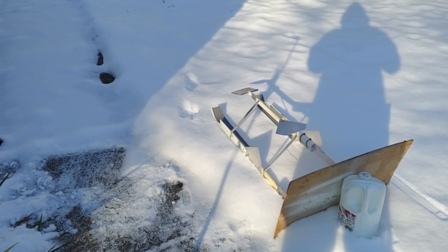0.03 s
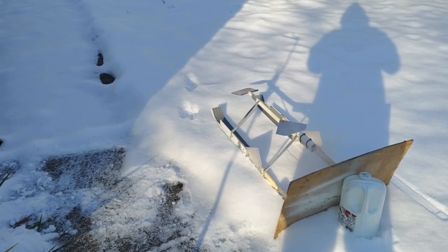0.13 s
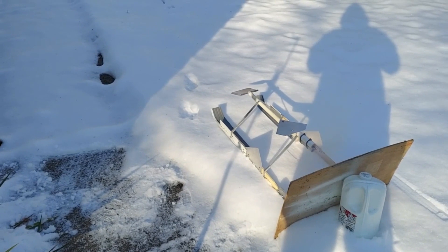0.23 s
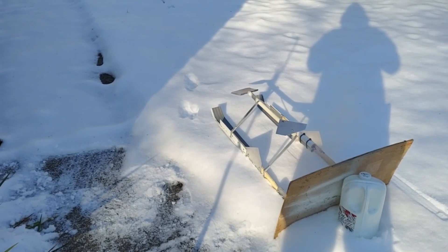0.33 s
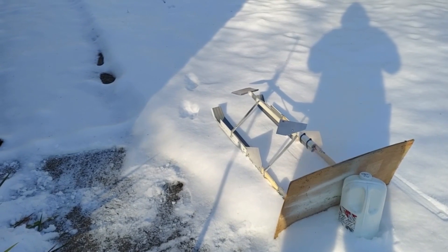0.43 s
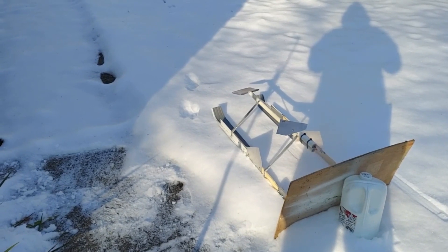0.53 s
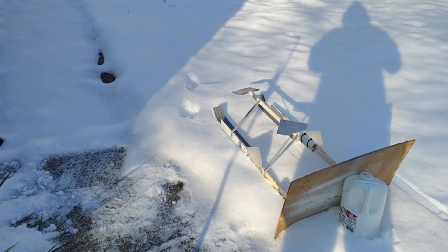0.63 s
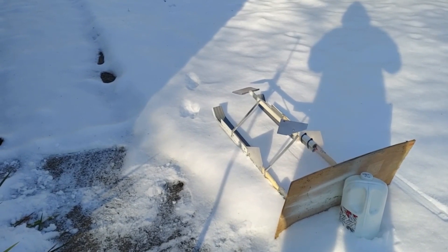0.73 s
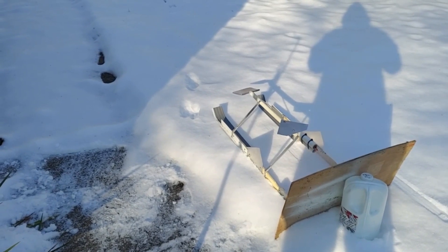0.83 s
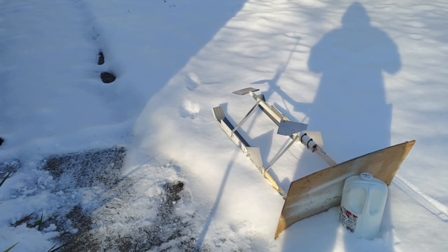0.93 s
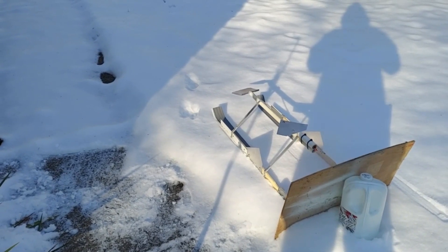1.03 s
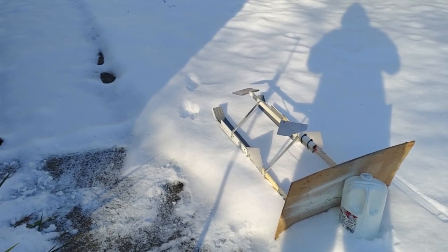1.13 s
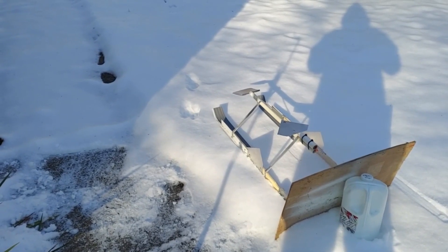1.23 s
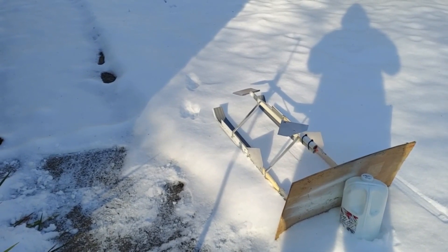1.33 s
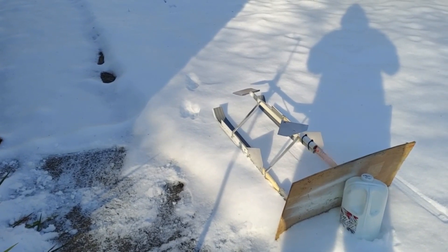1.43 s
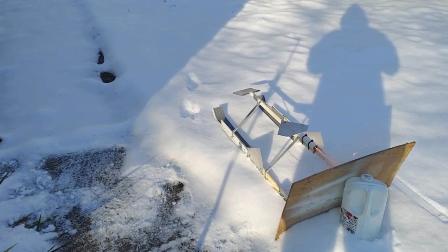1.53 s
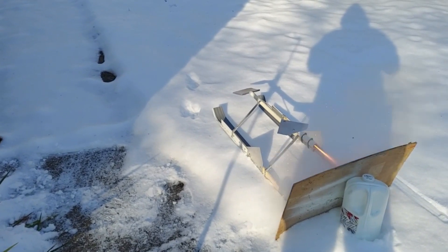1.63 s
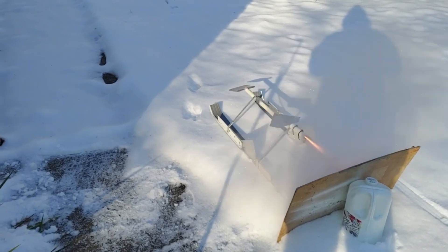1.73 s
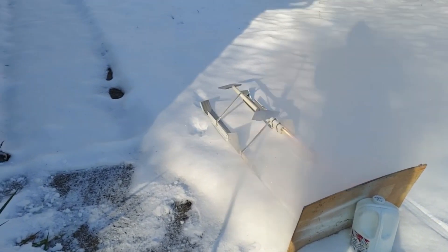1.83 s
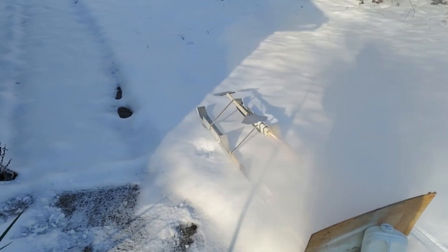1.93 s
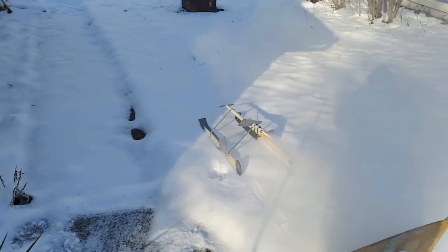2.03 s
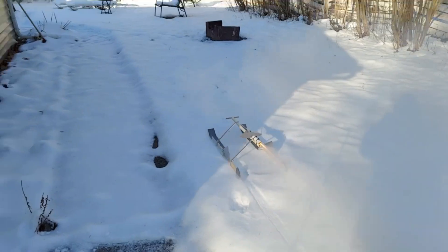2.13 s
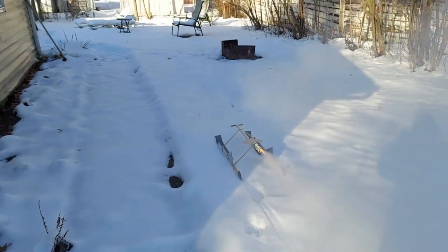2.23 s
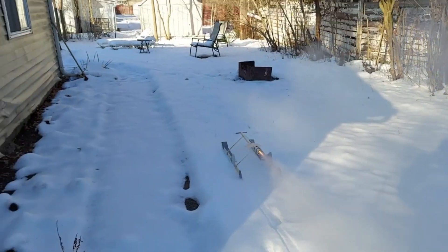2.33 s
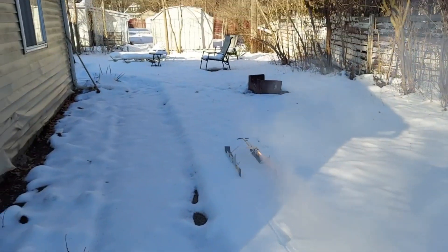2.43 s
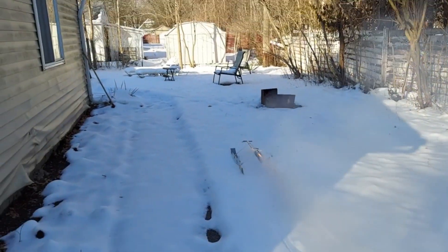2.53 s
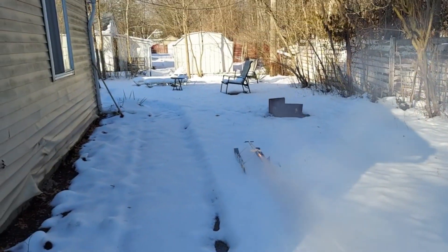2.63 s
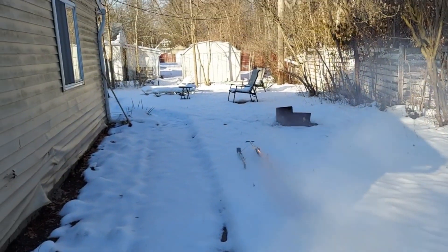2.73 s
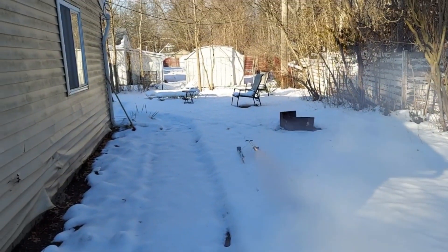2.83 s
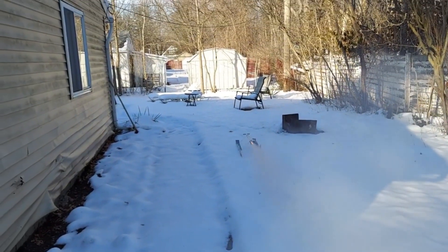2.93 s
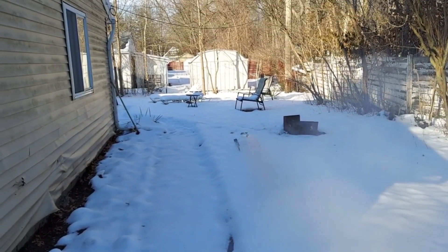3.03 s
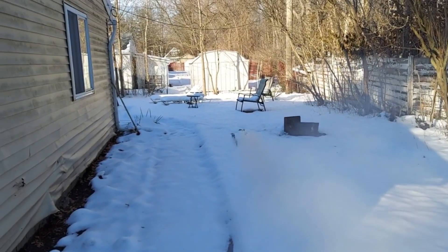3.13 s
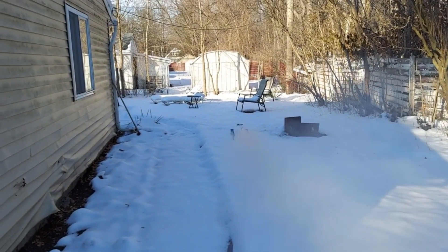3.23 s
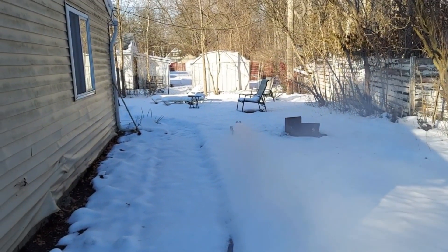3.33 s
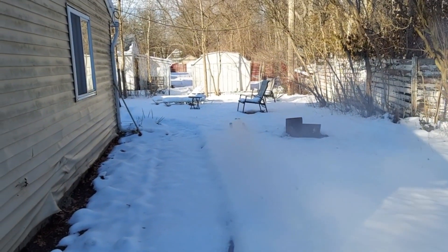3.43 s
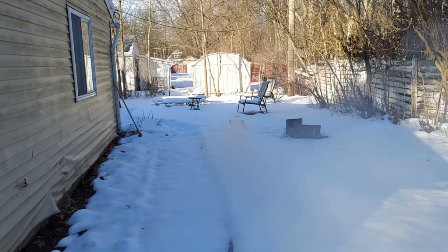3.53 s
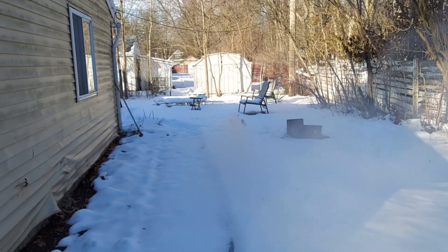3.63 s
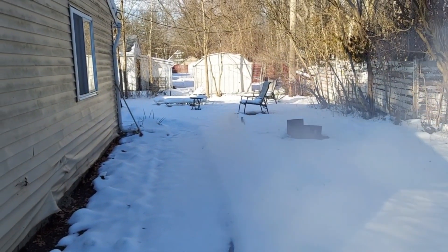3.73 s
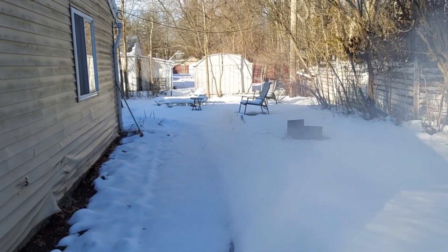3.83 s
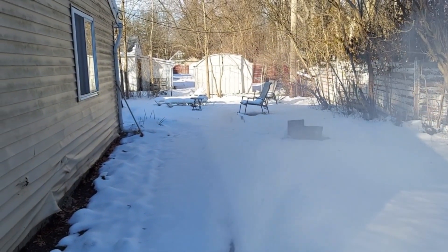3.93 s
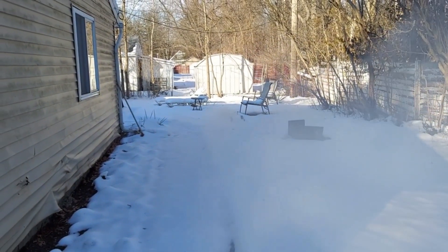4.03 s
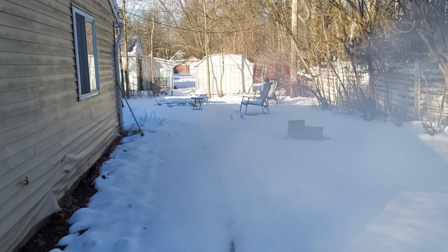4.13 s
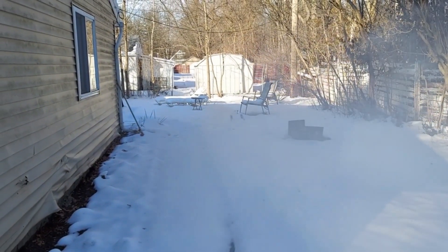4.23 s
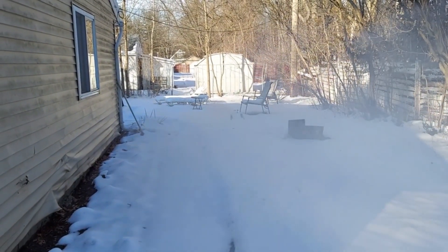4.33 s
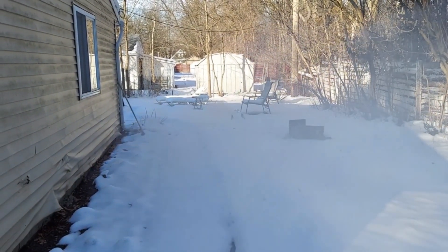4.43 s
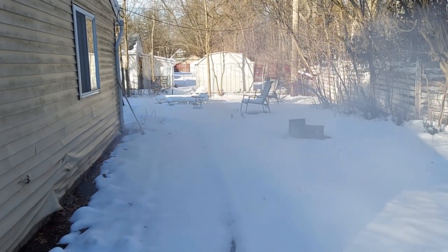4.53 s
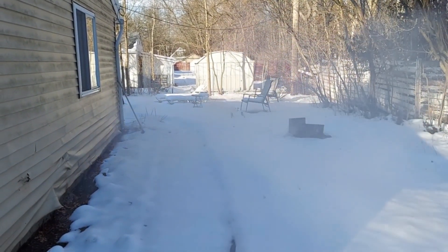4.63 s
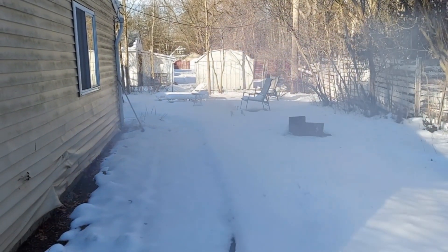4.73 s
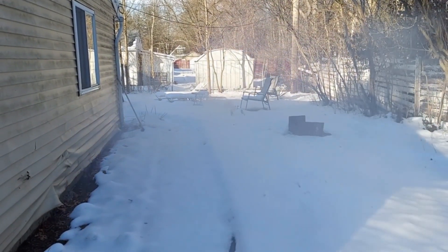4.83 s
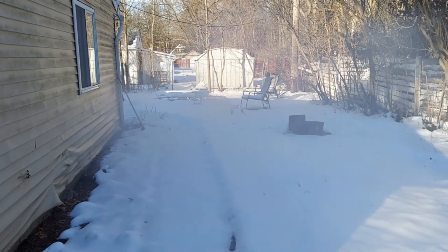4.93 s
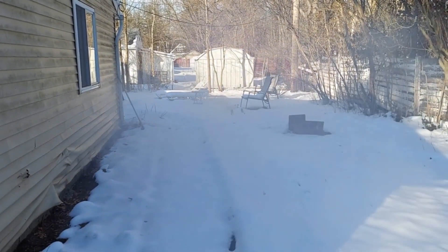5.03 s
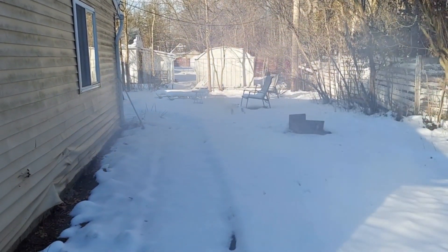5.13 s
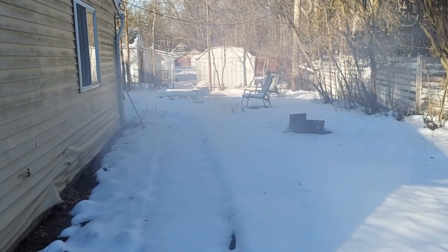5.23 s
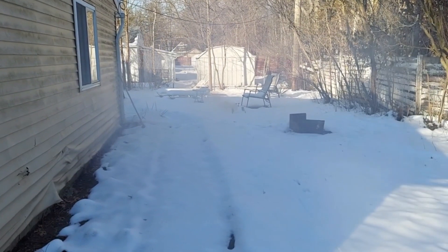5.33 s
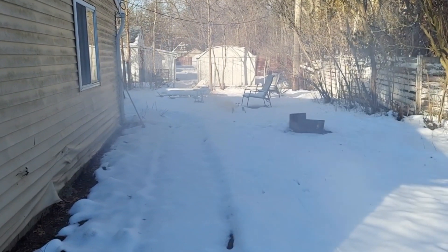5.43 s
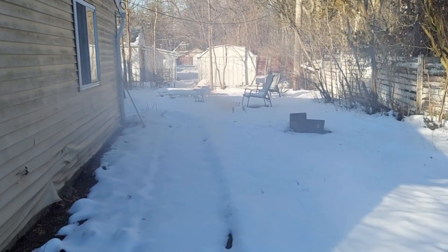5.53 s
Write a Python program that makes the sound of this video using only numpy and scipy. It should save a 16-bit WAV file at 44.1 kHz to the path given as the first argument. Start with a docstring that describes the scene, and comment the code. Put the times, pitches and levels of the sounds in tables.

```python
"""Low traffic rumble and wind in a snowy yard, then the fizzing igniter of a solid-fuel motor on a sledge.
The motor lights a step from a hand-held two-port microphone and hisses for two seconds, with echoes; its
exhaust buffets and slaps the ports; then it smoulders far off. Hisses, wind and rumble are shaped noise, slaps
are pulses. The recorder cuts its gain for the burn, holds about a second, then lets the quiet yard back."""
import sys
import numpy as np
from scipy import signal
from scipy.fft import rfft, irfft, next_fast_len
from scipy.io import wavfile
from scipy.ndimage import uniform_filter1d

SR = 44100
rng = np.random.default_rng(int(sys.argv[2]) if len(sys.argv) > 2 else 0)


def unload_audio(sound):
    """Save the sound as a 16-bit wav file, at the path given as the first command line argument."""
    columns = np.transpose(np.atleast_2d(sound))
    # keep every value between -1 and 1, then stretch to whole-number steps
    steps = np.round(np.clip(columns, -1, 1) * 32767)
    wavfile.write(sys.argv[1], SR, steps.astype(np.int16))


N = 246651

# All source levels are before the recorder's gain control.


def amp(db):
    """Decibels to gain."""
    return 10 ** (np.asarray(db) / 20)


def in_time(rows, t):
    """The columns of a table, interpolated at the times t."""
    s, *columns = np.transpose(rows)
    return [np.interp(t, s, c) for c in columns]


def while_on(rows, t):
    """1 inside the span of a table, with 15 ms fades outside it."""
    since_start_s, to_end_s = t - rows[0][0], rows[-1][0] - t
    return np.clip(np.minimum(since_start_s, to_end_s) / .015 + 1, 0, 1)


def swells(rows, t, fade_db_s):
    """Level in dB of the loudest event at each port; each fades evenly before and after its peak."""
    s, *peaks = np.transpose(rows)
    coarse_t = t[::64]
    fade = fade_db_s * np.abs(coarse_t - s[:, None])
    return np.array([np.interp(t, coarse_t, np.max(p[:, None] - fade, axis=0)) for p in peaks])


def pair(alike, lag):
    """White noise at two ports: a shared part, lag samples (rounded) later at the left, and own parts."""
    shared, left, right = rng.standard_normal((3, N))
    common = np.array([np.roll(shared, round(lag)), shared])
    own = np.array([left, right])
    return np.sqrt(alike) * common + np.sqrt(1 - alike) * own


def coloured(white, colour, band):
    """Filter to a spectrum that falls 12 dB per octave beyond its ends; rms 1 inside band."""
    size = next_fast_len(N)
    hz = np.fft.rfftfreq(size, 1 / SR) + 1
    knots, db = np.transpose(colour)
    outside = np.log2(np.maximum(knots[0] / hz, 1) * np.maximum(hz / knots[-1], 1))
    gain = amp(np.interp(np.log(hz), np.log(knots), db) - 12 * outside)
    inside = np.sum(gain[(hz > band[0]) & (hz < band[1])] ** 2) / len(hz)
    return irfft(rfft(white, size) * gain, size)[..., :N] / np.sqrt(inside)


def wander(per_s, shape=(1,)):
    """Slow chance with spread 1: random points, per_s each second, joined smoothly."""
    points = rng.standard_normal(shape + (2000,))
    at = np.arange(N) / SR * per_s
    whole = at.astype(int)
    mix = np.sin(np.pi / 2 * (at - whole)) ** 2
    return np.sqrt(1 - mix) * points[..., whole] + np.sqrt(mix) * points[..., whole + 1]


def resonance(x, hz, width_hz):
    """A band of x around hz, gain about 1 on top."""
    r, w = np.exp(-np.pi * width_hz / SR), 2 * np.pi * hz / SR
    return signal.lfilter((1 - r * r) / 2 * np.array([1, 0, -1]), [1, -2 * r * np.cos(w), r * r], x)


def ports(x, lifts):
    """Sound meets the housing aslant, so each port lifts or dulls bands of its own."""
    return np.array([side + sum(share * resonance(side, hz, width_hz) for hz, width_hz, share in own)
                     for side, own in zip(x, lifts)])


SHADE_FROM_HZ = 6600


def tilted(x, rows, column, pivot_hz, from_hz, patchy_db, shade_db=0):
    """Tilt the spectrum about a pivot; the housing shades right against left by shade_db per octave on top."""
    hz, t, z = signal.stft(x, SR, nperseg=256)
    octaves = np.log2(np.maximum(hz, from_hz) / pivot_hz)   # no further tilt below from_hz
    # flickering patches, about 35 ms by 2.8 kHz
    patches = uniform_filter1d(rng.standard_normal((len(hz), len(t))), size=12, axis=1)
    patches = uniform_filter1d(patches, size=16, axis=0)
    db = np.outer(octaves, in_time(rows, t)[column]) + patchy_db * patches / patches.std()
    shade = shade_db / 2 * np.log2(np.maximum(hz / SHADE_FROM_HZ, 1))
    sides_db = np.array([shade, -shade])[..., None]
    return signal.istft(z * amp(db + sides_db), SR, nperseg=256)[1][..., :N]


def hiss(rows, colour, alike, lag, flutter_db, flutter_per_s, patchy_db, shade_db):
    """Gas tearing out of a nozzle: bright noise whose level flutters with the burning."""
    t = np.arange(N) / SR
    level_db, _, pan_db = in_time(rows, t)
    noise = coloured(pair(alike, lag), colour, (3000, 7500))
    noise = tilted(noise, rows, 1, 5000, 3000, patchy_db, shade_db)
    sides_db = np.array([pan_db, -pan_db]) / 2
    return noise * amp(level_db + sides_db + flutter_db * wander(flutter_per_s)) * while_on(rows, t)


# Distant traffic. Each row: time in seconds, 150-600 Hz level in dB before tilt,
# brightness in dB per octave, left minus right in dB.
TRAFFIC = [(0, -59.5, 1, -1), (.25, -56, -0.5, .2), (1.4, -56.5, 1, .3), (4.4, -55, -2, -2),
           (4.7, -50.5, 1, -2.5), (5.0, -47.5, 1, 0), (5.3, -54, -1, 0), (5.6, -56, -0.5, -1)]
# Traffic spectrum. Each row: frequency in Hz, relative density in dB per Hz.
TRAFFIC_COLOUR = [(40, -3), (80, -1), (150, -5), (300, -6), (600, -11.5), (1000, -19), (1500, -22.5),
                  (2000, -39), (2500, -43)]
# Light wind and handling. Each row: time in seconds, left level in dB, right level in dB.
BREEZE = [(0, -71, -63), (1.45, -66.5, -65), (3.6, -61, -59), (4.4, -59, -55.5), (5.6, -59, -57)]
# Gusts above the breeze. Each row: time in seconds, left peak in dB, right peak in dB.
GUSTS = [(0.29, -44, -50), (0.52, -47.5, -61), (0.62, -60, -57), (0.76, -59, -56), (1.07, -54, -66),
         (1.38, -58, -63), (3.82, -58, -45.5), (4.1, -57, -39), (4.2, -38.5, -54), (4.47, -33, -49),
         (4.61, -34, -47), (4.88, -52, -46), (5.03, -54, -50), (5.17, -47, -54), (5.28, -57, -40),
         (5.45, -46.5, -50)]
# Band of the wind lumps: low and high edge in Hz.
BREEZE_HZ = (45, 90)
TRAFFIC_LIKENESS, GUST_FADE_DB_S = 0.61, 140


def yard():
    """Far traffic rumble, partly alike at both ports, and low lumps of air on the ports."""
    t = np.arange(N) / SR
    level_db, _, pan_db = in_time(TRAFFIC, t)
    rumble = coloured(pair(TRAFFIC_LIKENESS, 3.2), TRAFFIC_COLOUR, (150, 600))
    rumble = tilted(rumble, TRAFFIC, 1, pivot_hz=300, from_hz=200, patchy_db=0.44)
    sides_db = np.array([pan_db, -pan_db]) / 2
    traffic = rumble * amp(level_db + sides_db + .8 * wander(7.0))
    lumps = coloured(pair(0.42, 0), [(hz, 0) for hz in BREEZE_HZ], BREEZE_HZ)
    wind_db = np.maximum(in_time(BREEZE, t), swells(GUSTS, t, GUST_FADE_DB_S))
    return traffic + lumps * amp(wind_db)


# Igniter hiss. Each row: time in seconds, 3-7.5 kHz level in dB before tilt and port lifts,
# brightness in dB per octave, left minus right in dB.
IGNITER = [(0.02, -76.5, 7.5, 2.5), (0.2, -71.5, 4, 2), (0.365, -66, 0, 1.5), (0.55, -70, 6, 0.5),
           (0.9, -74.5, 10.5, 0.5), (1.06, -68, 7.5, 0), (1.4, -70, 10.5, 1)]
# Igniter spectrum at brightness 0, notched by the housing. Each row: frequency in Hz, density in dB per Hz.
IGNITER_COLOUR = [(1800, 0), (2200, -16), (2550, -27), (2900, -6), (3200, -1), (4200, -6.5), (5400, -6.5),
                  (6300, -8), (7500, -5), (8600, -20), (9500, -13), (11400, -11.5), (12300, -3.5),
                  (15600, -6)]
# Port bands for near sound, left rows then right. Each row: centre in Hz, width in Hz, added share.
NEAR_LIFTS = ([(7300, 1600, -.3), (10700, 940, .4), (12100, 800, -.35), (15200, 1200, 0.46)],
               [(7500, 900, .2), (12300, 900, .2), (10400, 1600, -.2)])


def igniter():
    """A faint fizz: gas noise with fast level flutter."""
    fizz = hiss(IGNITER, IGNITER_COLOUR, 0.48, 5.0, flutter_db=0.7, flutter_per_s=49, patchy_db=1.0, shade_db=-3.0)
    return ports(fizz, NEAR_LIFTS)


# Motor hiss. Each row: time in seconds, 3-7.5 kHz level in dB before tilt and port lifts,
# brightness in dB per octave, left minus right in dB.
BURN = [(1.41, -65, 5.8, -2.6), (1.44, -45.5, 5, 0), (1.468, -8.5, 6.5, 0), (1.495, -6, 8.5, -0.5),
        (1.53, 1, 6, 1), (1.59, 0.5, 7.5, 1.5), (1.62, 6.5, 2.5, 0.5), (1.75, 8.5, 3, 1),
        (1.92, 5, 2.5, -0.5), (2.02, 7.3, 0.5, -1.5), (2.36, 6.5, 1.7, -0.3), (2.45, 3.5, 1, 4),
        (2.95, 3.5, 2, 2.6), (3.1, 2.5, 0.4, 0.2), (3.2, 1, 2, 2), (3.365, -1.5, 0.5, 2.5),
        (3.4, -17, -2, 0), (3.5, -37.5, -4.5, -1)]
# Motor spectra at brightness 0, near and far. Each row: frequency in Hz, density in dB per Hz.
NEAR_COLOUR = [(100, -4), (400, -10.5), (900, -6), (1600, 0), (2500, -9.5), (3300, -0.5), (5000, -3),
               (6200, -6.5), (7500, -5.5), (8400, -17.5), (10300, -8.5), (11300, -7), (13000, -1),
               (15600, -2)]
BURN_COLOUR = [(200, -11.5), (500, -16), (900, -8.5), (1600, 0.0), (2200, -2), (2700, -4), (3300, -0.5),
               (5000, -3.0), (6200, -6.5), (7800, -4.5), (9000, -18), (10500, -11.5), (12500, -3.5),
               (15600, -5.5)]
# Port bands for the far motor, left rows then right. Each row: centre in Hz, width in Hz, added share.
BURN_LIFTS = ([(10700, 540, .5), (15550, 500, .9)], [(8000, 900, 0.28), (12220, 1100, .55)])
# Exhaust scrambling and microphone turn. Each row: time in seconds, share both ports hear alike 0-1,
# microphone turned to the far yard 0-1.
TURN = [(1.4, 0.94, 0), (1.59, 1, 0), (1.64, 0.34, 0.1), (1.9, 0, 0.12), (2.4, 0.13, 0.96),
        (3.0, 0.3, 0.98), (3.2, 0.38, 0.96)]


def burn():
    """The microphone turns after the leaving sledge: near colour and delay give way to far ones."""
    alike, turned = in_time(TURN, np.arange(N) / SR)
    near = hiss(BURN, NEAR_COLOUR, alike, 5.0, flutter_db=.3, flutter_per_s=20, patchy_db=1.5, shade_db=-1.0)
    far = hiss(BURN, BURN_COLOUR, alike, -24.0, flutter_db=0.25, flutter_per_s=20, patchy_db=1.37, shade_db=2.5)
    near, far = ports(near, NEAR_LIFTS), ports(far, BURN_LIFTS)
    return np.sqrt(1 - turned) * near + np.sqrt(turned) * far


# Echo tails, quick and long. Each row: start level in dB before the band boost, t60 in seconds.
TAILS = [(-7.5, 0.21), (-27.5, 2.7)]
ECHO_HZ, ECHO_WIDTH_HZ, ECHO_BOOST = 1798, 460, 1.2


def echoes(x):
    """Houses, fences and trees return the burn: a quick tail from the yard, a long one from the streets."""
    t = np.arange(3 * SR) / SR
    decay = sum(amp(db - 60 * t / t60) for db, t60 in TAILS) * (t > .012)
    response = rng.standard_normal((2, len(t))) * decay / np.sqrt(SR)
    tail = signal.fftconvolve(x, response, axes=1)[:, :N]
    return tail + ECHO_BOOST * resonance(tail, ECHO_HZ, ECHO_WIDTH_HZ)   # the walls favour one band


# Exhaust gas over each port. Each row: time in seconds, left level in dB, right level in dB.
BLAST = [(1.585, -1, -16), (1.6, -6, -4), (1.63, 10, 11), (1.7, 3, 3.5), (2.0, 6, 6), (2.3, 6.5, 7.5),
         (2.55, 7, 0.5), (2.76, 8.5, 2), (2.83, 9.5, -16), (3.01, 5.5, -7), (3.035, -15, -9),
         (3.11, 0.5, 7), (3.2, -23, -22), (3.38, -30, -30)]
# The stream swings squarely across a port. Each row: time in seconds, left peak in dB, right peak in dB.
SURGES = [(1.617, 8, 12.5), (2.88, 14.5, -12), (2.925, 7, 10.5), (3.085, 4, 13.5), (3.308, 2, -27)]
SURGE_FADE_DB_S = 500


def stream_db(t):
    """Level of the exhaust stream at each port: the flow, or a surge where it is louder."""
    return np.maximum(in_time(BLAST, t), swells(SURGES, t, SURGE_FADE_DB_S))


# Stream speed. Each row: time in seconds, brightness in dB per octave, lumpiness in dB.
BLAST_SPEED = [(1.6, -1.5, 6), (1.7, 2.5, 1), (2.3, 1.5, 0), (2.7, 0.57, 1.5), (3.0, -3.5, 4.5),
               (3.35, -2.5, 5)]
# Stream spectrum at brightness 0. Each row: frequency in Hz, density in dB per Hz.
BLAST_COLOUR = [(25, -18.5), (45, -5), (80, -1.5), (150, 0.0), (300, -2), (600, -6), (1200, -11),
                (2500, -15), (6000, -29)]
# below CORE_DB a port nears the edge of the stream, where the sound dulls above EDGE_HZ
CORE_DB, EDGE_HZ = 3.5, 120


def blast():
    """Eddies beat on each port alone; a fast stream is dense and bright, a slow one comes in dull lumps."""
    t = np.arange(N) / SR
    lumpy_db = in_time(BLAST_SPEED, t)[1]
    level_db = stream_db(t)
    beats = amp(lumpy_db * wander(160, (2,)) - np.log(10) / 20 * lumpy_db ** 2)   # mean power stays
    noise = coloured(beats * pair(0, 0), BLAST_COLOUR, (100, 700))
    noise = tilted(noise, BLAST_SPEED, 0, pivot_hz=283, from_hz=260, patchy_db=0.97)
    # at the edge only the large slow eddies are left
    dull = signal.sosfilt(signal.butter(1, EDGE_HZ, fs=SR, output="sos"), noise)
    edge = np.clip((CORE_DB - level_db) / 12, 0, 1)
    return ((1 - edge) * noise + edge * 1.6 * dull) * amp(level_db) * while_on(BLAST, t)


# Single eddies as the stream arrives and breaks up. Each row: peak time in seconds, port (1 left, -1 right),
# peak in dB before the bass cut, width in ms (twice the rise time).
SLAPS = [(1.61, -1, 23.5, 1.2), (1.614, -1, 21.5, 2.6), (1.621, 1, 23.5, 1.3), (1.624, 1, 22, 1.9),
         (1.625, -1, 19, 0.5), (2.875, 1, 24, 2.1), (2.897, 1, 24, 0.88), (2.936, -1, 23, 0.77),
         (2.954, 1, 22, 1.0), (2.995, 1, 20, 1.6), (3.069, -1, 23.5, 0.75), (3.095, -1, 21.5, 0.6),
         (3.104, -1, 19.5, 0.83), (3.301, 1, 6, 2), (3.312, 1, 8.5, 0.99)]
SLAP_CUT_HZ = 80
# weaker eddies at random times in the break-up, relative to the stream level at their port
BREAKUP_S, SMALL_SLAPS = (2.91, 3.16), 20
SMALL_SLAP_DB, SMALL_SLAP_PLUS_MINUS_DB, SMALL_SLAP_MS = 9.5, 5.0, 1.05


def slaps():
    """A lone eddy pushes or pulls one membrane, which swings back through the microphone's bass cut."""
    out, t = np.zeros((2, N)), np.arange(441) / SR
    chance, level_db = rng.random((SMALL_SLAPS, 3)), stream_db(np.arange(N) / SR)
    times = np.interp(chance[:, 0], [0, 1], BREAKUP_S)
    sides = (chance[:, 1] < .5).astype(int)   # 0 left, 1 right
    offsets_db = SMALL_SLAP_DB + SMALL_SLAP_PLUS_MINUS_DB * (2 * chance[:, 2] - 1)
    peaks_db = level_db[sides, (times * SR).astype(int)] + offsets_db
    small = [(s, 1 - 2 * side, db, SMALL_SLAP_MS) for s, side, db in zip(times, sides, peaks_db)]
    every = list(SLAPS) + small
    signs = rng.choice([-1, 1], len(every))
    for (s, port, peak_db, width_ms), sign in zip(every, signs):
        rise_s = width_ms / 1000 / 2
        push = t / rise_s * np.exp(1 - t / rise_s)
        at = round((s - rise_s) * SR)
        out[int(port < 0), at:at + len(t)] += sign * amp(peak_db) * push
    return signal.sosfilt(signal.butter(2, SLAP_CUT_HZ, "high", fs=SR, output="sos"), out)


# Smoulder hiss. Each row: time in seconds, 3-7.5 kHz level in dB before tilt, sputters, echo and port lifts,
# brightness in dB per octave, left minus right in dB.
SMOULDER = [(3.42, -35.5, 5.5, 1.8), (3.5, -35, -1, 1.9), (3.63, -39.5, 1.8, 3), (3.9, -39, 0.5, 2.5),
            (4.15, -41, -3, 1.3), (4.7, -39.5, -3, 1.54), (4.9, -38, -3.3, 1.7), (5.1, -42.5, -2.5, 0.7),
            (5.6, -52.5, -3.5, 1.5)]
# Smoulder spectrum at brightness 0. Each row: frequency in Hz, density in dB per Hz.
SMOULDER_COLOUR = [(700, -6.5), (1300, -9), (1900, -5.5), (2300, -13.5), (3000, 1), (3800, 1), (5000, 0.4),
                   (6000, -6.5), (7800, -2), (9200, -14.5), (10200, -11.5), (12200, 1.3), (13400, -1.5),
                   (15600, 3)]
# Port bands for the smoulder, left rows then right. Each row: centre in Hz, width in Hz, added share.
SMOULDER_LIFTS = ([(5140, 610, 0.49), (15800, 500, 0.81)], [(3540, 810, 0.48), (12300, 1300, .3)])
# Sputters. Each row: time in seconds, level added in dB.
SPUTTERS = [(5.14, 4), (5.22, 4.5), (5.32, 3.5), (5.44, 4.5)]
SPUTTER_FADE_DB_S = 110
WALL_ECHO_S, WALL_ECHO_SHARE = .00232, 0.35


def smoulder():
    """Far down the yard the sputtering hiss comes with an echo off the house wall, which combs it."""
    x = hiss(SMOULDER, SMOULDER_COLOUR, 0.29, -1.4, flutter_db=1.0, flutter_per_s=23, patchy_db=0.8, shade_db=2.5)
    added_db = np.maximum(swells(SPUTTERS, np.arange(N) / SR, SPUTTER_FADE_DB_S), 0)
    x = x * amp(added_db)
    echo = np.pad(x, ((0, 0), (round(WALL_ECHO_S * SR), 0)))[:, :N]
    return ports(x + WALL_ECHO_SHARE * echo, SMOULDER_LIFTS)


def scene():
    """All sources at the two ports."""
    jet = burn()
    return yard() + igniter() + jet + echoes(jet) + blast() + slaps() + smoulder()


CUT_DB, THRESHOLD_DB, CUT_DB_PER_DB = 28.5, -25, 4.0   # most cut, start of cut, slope above it
ATTACK_S, HOLD_S, RELEASE_DB_S = 0.023, 0.96, 28.5
CUTOFF_HZ = 15730


def record(dry):
    """Housing dulls the very top; loud sound cuts the gain, which holds and creeps back; peaks are rounded."""
    t = np.arange(N) / SR
    dry = dry - .3 * resonance(dry, hz=14700, width_hz=2500)
    level_db = 10 * np.log10(uniform_filter1d(np.mean(dry ** 2, axis=0), size=441) + 1e-12)
    wanted_db = np.clip(CUT_DB_PER_DB * (level_db - THRESHOLD_DB), 0, CUT_DB)
    # the cut falls at the release rate, but from so high that a full cut stays full during the hold
    held_db = wanted_db * (1 + HOLD_S * RELEASE_DB_S / CUT_DB)
    falling_db = np.maximum.accumulate(held_db + RELEASE_DB_S * t) - RELEASE_DB_S * t
    cut_db = np.minimum(falling_db, CUT_DB)
    r = np.exp(-1 / (ATTACK_S * SR))
    wet = dry * amp(-signal.lfilter([1 - r], [1, -r], cut_db))
    rounded = .95 * np.tanh(wet / .95)
    return signal.sosfilt(signal.ellip(14, .3, 75, CUTOFF_HZ, fs=SR, output="sos"), rounded)


dry = scene()
out = record(dry)
unload_audio(out)
```